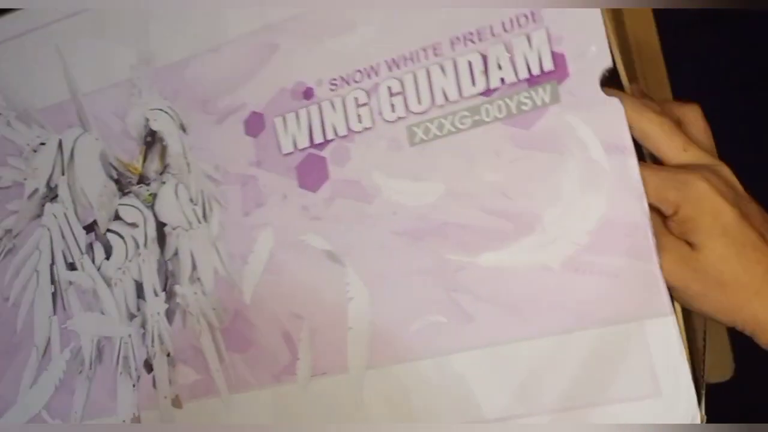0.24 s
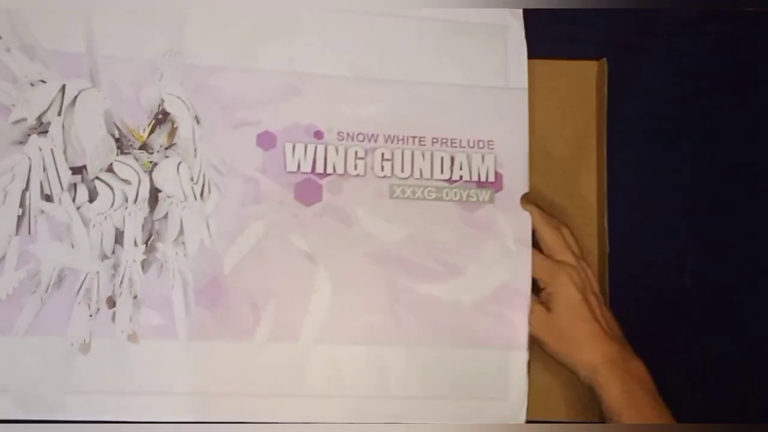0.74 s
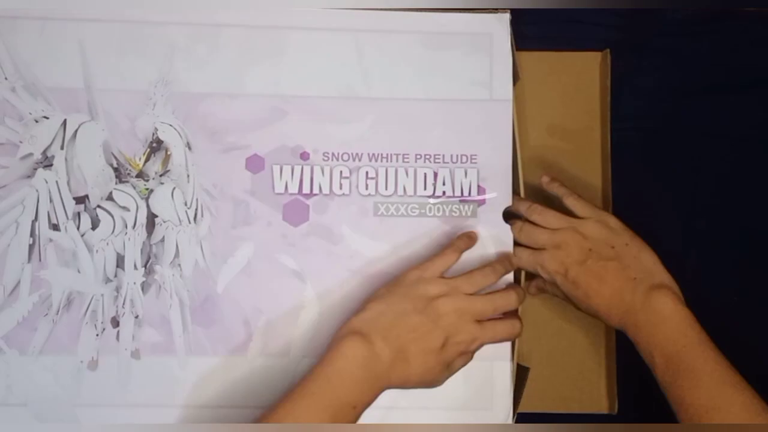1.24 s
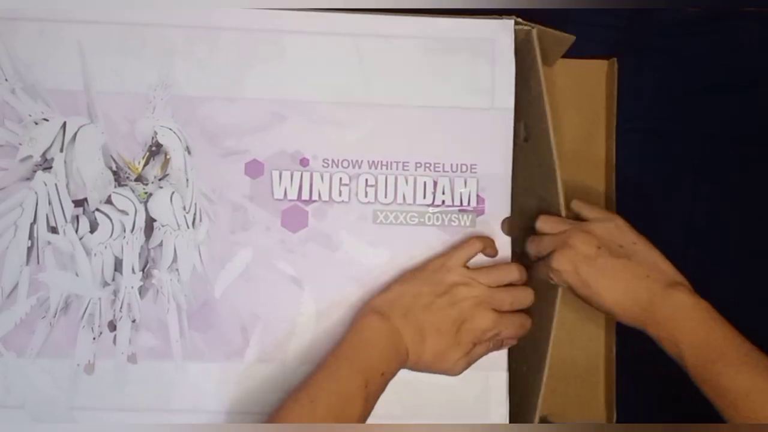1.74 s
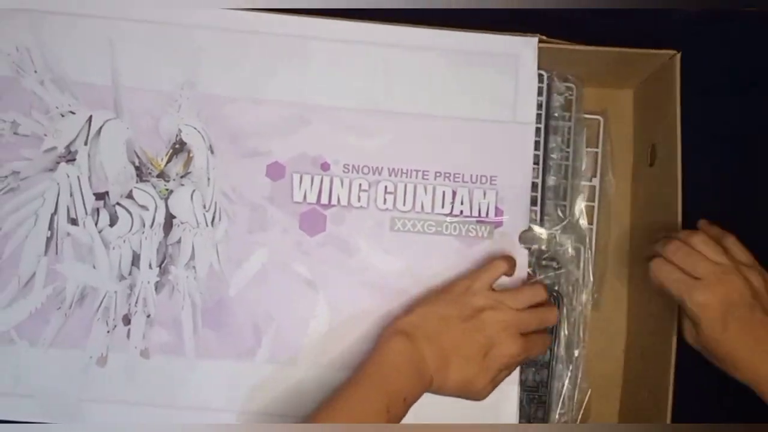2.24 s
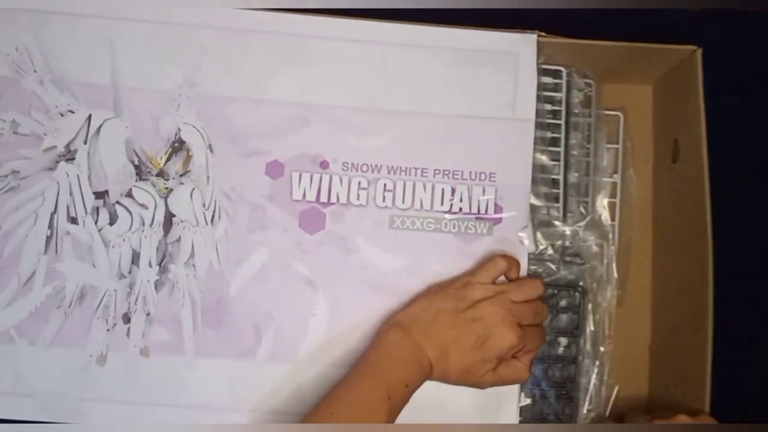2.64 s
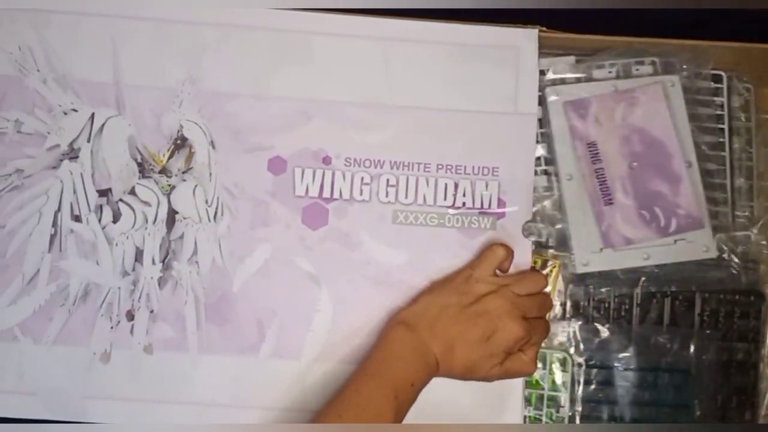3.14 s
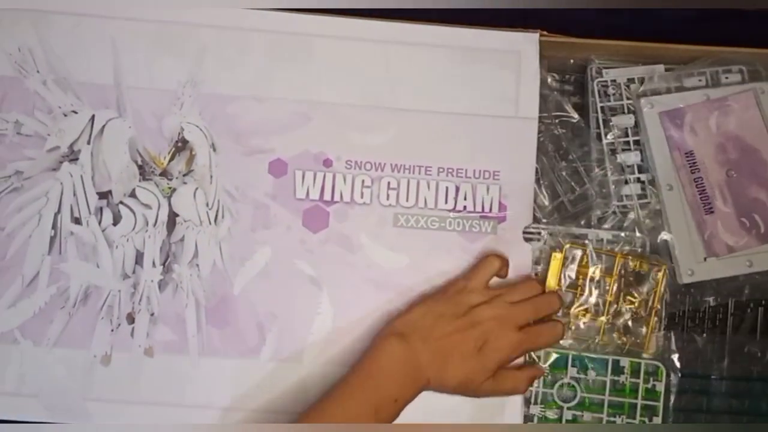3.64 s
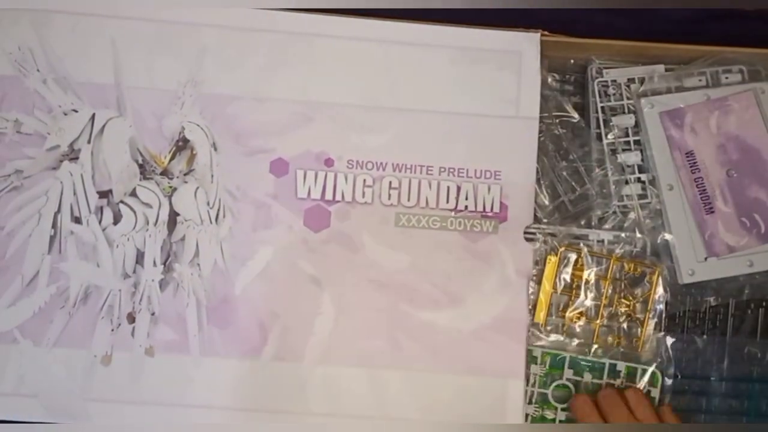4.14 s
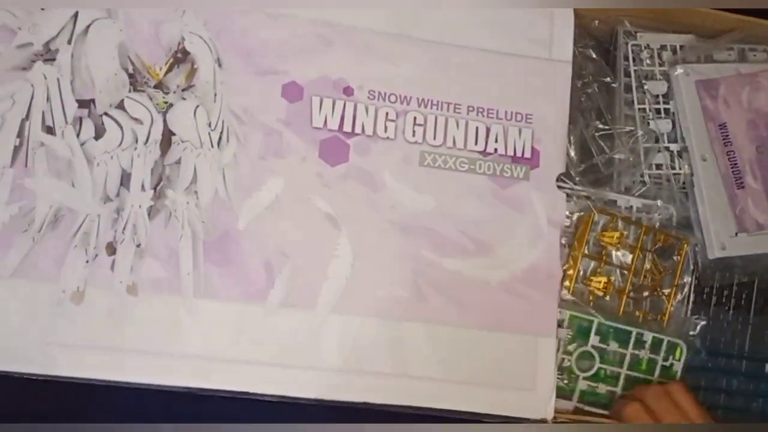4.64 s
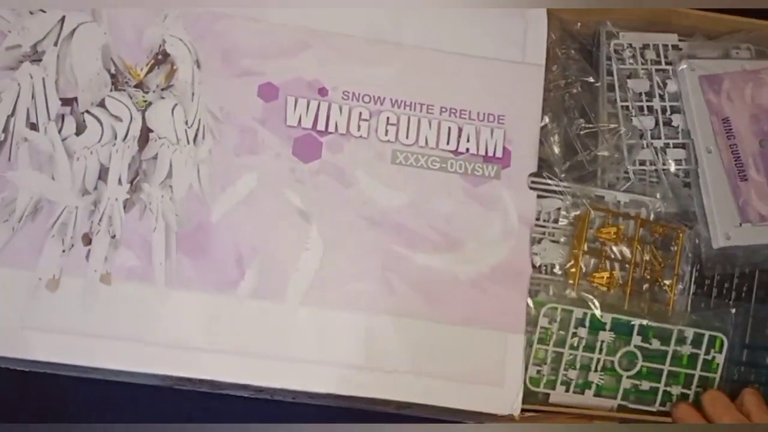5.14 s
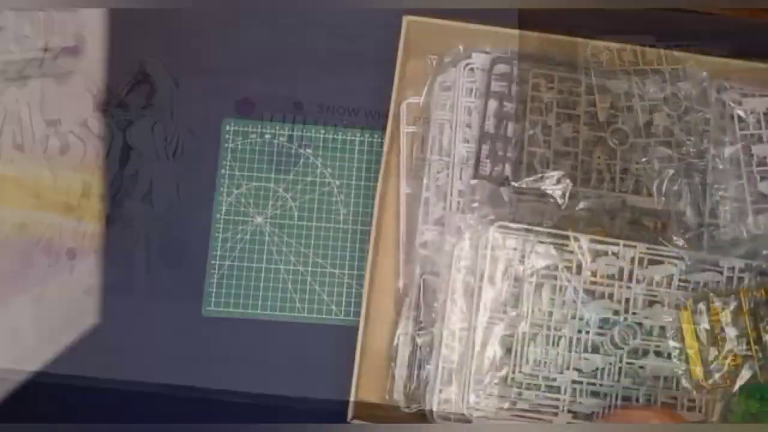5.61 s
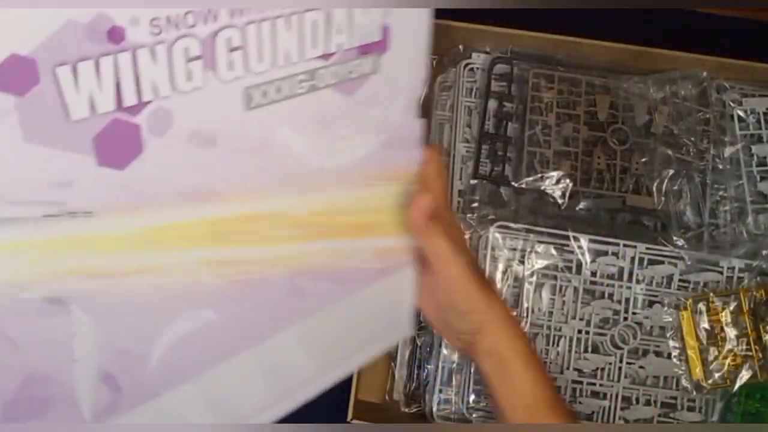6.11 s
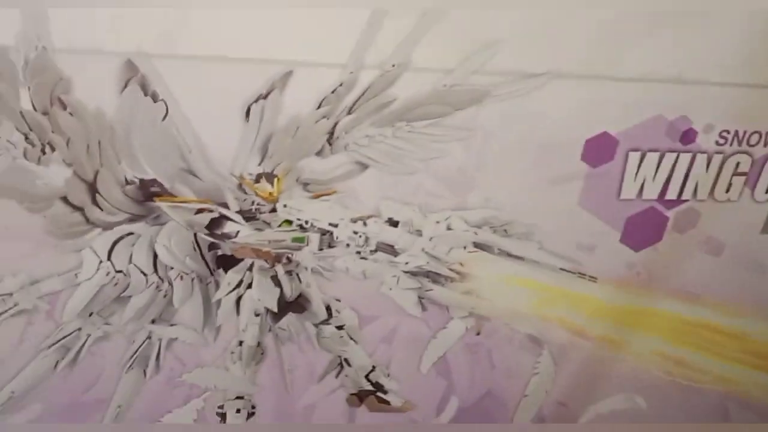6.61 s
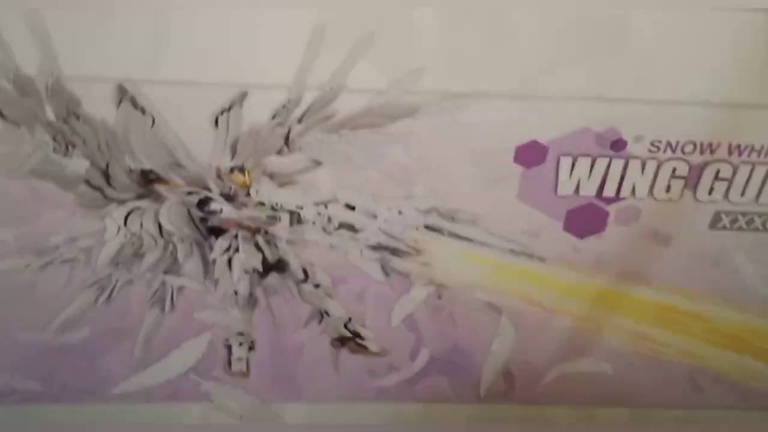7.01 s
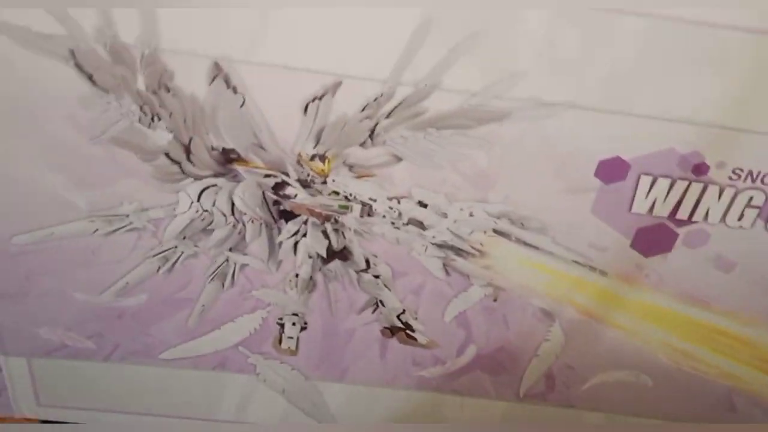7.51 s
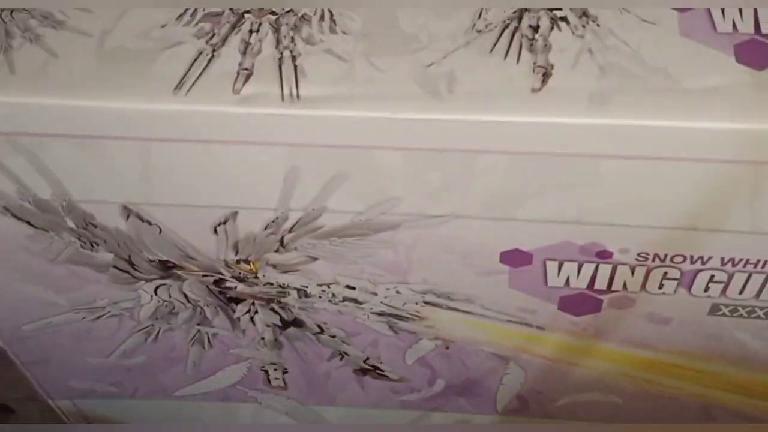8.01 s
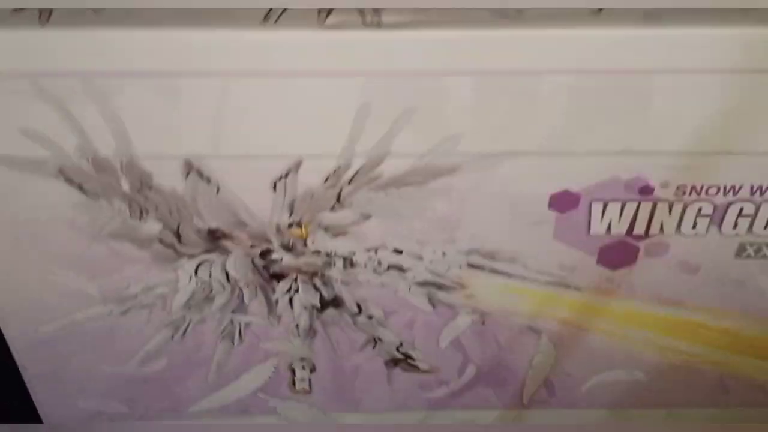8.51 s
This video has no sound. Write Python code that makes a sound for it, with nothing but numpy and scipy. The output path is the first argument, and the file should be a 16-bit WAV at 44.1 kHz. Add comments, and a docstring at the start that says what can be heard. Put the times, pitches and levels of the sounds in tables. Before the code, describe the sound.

A small dry room, close stereo microphone, faint wavering low hum sinking slightly in pauses. From 0 to 1.6 s hands brush printed cardboard in short hissy strokes, with dull light knocks, a few tiny snaps and a very faint squeak near 0.4. From 1.6 to 2.3 a tray scrapes out, raspy with a low board drone; small knocks around 2.3 to 2.4. A second, longer and steadier pull runs 2.6 to 3.55, then a hard, short bump at 3.7. From 4.0 to 4.9 plastic bags crinkle in short bursts with crisp snaps, strongest about 4.4 to 4.7. A near-quiet gap, then soft rubs and taps from 5.1. At 6.2 a loud knock and brush as the hollow lid is picked up; quick rubs and knocks continue, with a firm cluster at 7.7 to 7.9. Around 8.45 three rapid ringing catches judder, then a hollow thud and fading rubs until about 8.8.

```python
"""A large cardboard box is handled close to the microphone in a small room, over a faint, unsteady mains hum.
First hands brush the lid (rubbing noise) amid knocks, a faint squeak (dying tones) and snaps (noise clicks).
Then the tray scrapes out in two long pulls (rubbing noise again) and bumps free.
Next, bags of plastic parts crinkle: short rubs through film and board, with more snaps.
At the end the hollow lid is picked up, turned and knocked, its panels and air ring, and it judders briefly."""
import sys
import numpy as np
from scipy import signal
from scipy.fft import rfft, irfft, next_fast_len
from scipy.io import wavfile
from scipy.ndimage import uniform_filter1d, map_coordinates

SR = 44100
rng = np.random.default_rng(int(sys.argv[2]) if len(sys.argv) > 2 else 0)


def inscribe(sig):
    """Save sig as 16-bit PCM at rate SR to the path in sys.argv[1].

    A 1-D sig is mono; a 2-D sig holds one channel per row.
    Samples are clipped to [-1, 1] before scaling.
    """
    pcm = np.round(np.clip(np.atleast_2d(sig).T, -1, 1) * 32767)
    wavfile.write(sys.argv[1], SR, pcm.astype(np.int16))


N = 386316  # length in samples

# All levels in the tables are relative; the functions set the final loudness.
# quiet room air, spectrum: [pitch_hz, level_db (per Hz)]
AIR_SPECTRUM = [(25, -2.5), (75, 1), (120, 13), (190, -7), (400, -9.5), (700, -17), (2500, -17.5),
                (5000, -26), (8000, -24.5), (15500, -37)]
# hands brush the cardboard: [fastest_s, rise_s, fall_s, hiss_db, drone_db (against the hiss)]
HAND_STROKES = [(.028, 0.071, 0.049, -58, 3.5), (.12, 0.045, .075, -57, -4.5), (.2, 0.027, 0.047, -49, -4),
                (.285, 0.13, 0.075, -67, 9), (.535, .05, 0.054, -74.5, 10), (.655, .04, 0.11, -52.5, -14),
                (.777, 0.031, .045, -60, 8), (.885, .03, .04, -60, -15), (.945, 0.086, 0.087, -57.5, 0),
                (1.13, 0.066, 0.026, -64, -13), (1.335, 0.027, 0.062, -60, -2),
                (1.4, 0.036, 0.027, -68, -19), (1.49, 0.073, .04, -63.5, 2), (1.572, 0.033, 0.027, -58, -7),
                (2.435, 0.036, .035, -60, 8), (2.503, 0.046, 0.042, -59, -6), (2.54, 0.044, 0.027, -59, -3),
                (3.665, 0.04, 0.063, -57.5, -19.5), (3.71, 0.048, 0.022, -54, -5),
                (5.11, 0.055, .05, -70.5, -22), (5.168, 0.029, 0.052, -58.5, 2),
                (5.245, 0.074, 0.07, -59.5, -0.5), (5.312, 0.033, 0.036, -54.5, -22),
                (5.415, 0.072, 0.065, -57.5, 3), (5.498, 0.011, 0.026, -65.5, -20),
                (5.66, 0.061, 0.039, -63.5, 8.5), (5.79, 0.16, 0.032, -65, -14),
                (6.075, 0.0075, 0.075, -62, 4), (6.2, 0.043, 0.086, -45.5, 4.5),
                (6.34, .08, 0.086, -61, -2), (6.545, 0.042, .04, -57.5, -38),
                (6.61, 0.033, 0.047, -50.5, -2), (6.695, 0.11, 0.083, -61, 3.5),
                (6.82, 0.038, 0.041, -46.5, -2), (6.89, 0.033, 0.032, -62.5, -4),
                (6.975, .06, 0.18, -59.5, -58), (7.095, 0.047, 0.053, -49.5, 1.5),
                (7.165, 0.038, 0.037, -70, 12.5), (7.315, 0.079, 0.095, -63.5, -49),
                (7.503, 0.043, 0.023, -61, 1), (7.54, 0.042, 0.036, -71, 23), (7.625, 0.028, .04, -60, -15),
                (7.705, 0.042, 0.063, -51, 3), (7.795, .03, 0.037, -51, 1), (7.905, 0.084, 0.034, -59, 13),
                (7.985, 0.041, 0.038, -49, -4), (8.085, 0.048, 0.078, -58.5, -41),
                (8.128, 0.022, 0.036, -60, 1), (8.24, 0.13, 0.12, -62, -23.5),
                (8.325, 0.057, 0.045, -52, 1.5), (8.455, 0.045, 0.035, -51.5, 4),
                (8.535, 0.048, 0.058, -53.5, 3.5), (8.62, 0.093, 0.066, -55.5, -29),
                (8.73, 0.087, 0.088, -55, -6.5)]
# fingers on printed card, fine hiss: [pitch_hz, level_db (per Hz)]
SKIN_HISS_SPECTRUM = [(2500, -47.5), (4500, -17.5), (5500, -11.5), (6600, -5.5), (7800, 2), (9700, -6.5),
                      (12500, -5), (15500, -4)]
# hands pressing on card, coarse rasp: [pitch_hz, level_db (per Hz)]
BRUSH_SPECTRUM = [(300, -15), (700, -2.5), (1100, -0.5), (1800, 1.5), (3200, -0.5), (4400, -5),
                  (5400, -32.5), (8000, -44.5)]
# the lid droning under a rub: [pitch_hz, level_db (per Hz)]
LID_DRONE_SPECTRUM = [(30, -40), (130, -4), (210, -12.5), (330, -1.5), (480, 1), (720, -4), (1000, -7.5),
                      (1500, -24), (4000, -37.5)]
# jolts that ring the cardboard: knocks, one faint squeak at 0.438 s, and near the end (8.44 to 8.48 s)
# a stick-slip judder, quick catches about 20 ms apart that ring a panel:
# [start_s, level_db, panel_pitch_hz, decay_to_minus_60_db_s (set by the grip),
#  hollow_boom_db (against the jolt), scuff_db (against the jolt)]
PANEL_JOLTS = [(0.002, -42, 394, 0.076, -18, -25), (0.046, -47, 288, 0.11, -26, -18),
               (0.195, -40.5, 276, 0.18, -7, -20), (0.198, -46, 757, 0.084, -25, 1.5),
               (0.256, -42.5, 309, 0.045, -23, -10), (0.438, -58.5, 783, 0.082, -25, -26),
               (0.496, -50, 410, 0.036, -9, -2.5), (0.519, -48.5, 237, 0.063, -1, -8),
               (0.766, -36, 289, 0.075, 0, -9), (0.935, -46.5, 340, 0.1, -13, -12),
               (1, -37.5, 297, 0.036, -24, -19), (1.112, -48, 379, .05, -21, -14),
               (1.329, -49, 396, .07, -20, 0), (1.465, -46, 288, 0.05, -8, -14),
               (1.492, -50, 342, .06, -10, -10), (2.258, -46, 252, 0.076, -3, -22),
               (2.34, -46.5, 443, 0.073, -17, -6.5), (2.356, -36, 220, 0.092, -8, -8.5),
               (2.419, -38.5, 207, 0.053, -5, -13), (3.697, -22, 340, 0.031, -21.5, -16.5),
               (3.703, -31, 572, 0.039, -37, -24), (4.204, -36.5, 277, 0.036, -17, -14),
               (4.851, -49.5, 333, .04, -23, 7.5), (5.157, -53, 906, 0.089, -4, 6.5),
               (5.607, -42.5, 363, 0.062, 9.5, -1), (5.638, -35, 520, 0.04, -4, -9.5),
               (6.072, -50, 275, 0.058, -8, -22), (6.167, -33, 402, 0.24, -34, -11),
               (6.19, -23, 418, 0.088, -38, -20), (6.194, -32.5, 922, 0.1, -37, -27),
               (6.228, -28.5, 360, 0.076, -27, -18), (6.329, -40.5, 350, 0.077, -16, -6),
               (6.374, -27.5, 262, 0.023, -18, -12), (6.462, -42, 296, 0.032, -25, -16),
               (6.602, -42, 670, 0.15, -12, -9), (6.771, -36, 448, 0.04, -25, -27),
               (7.045, -39, 489, 0.15, -40, -10.5), (7.372, -40.5, 428, 0.072, -33, -25),
               (7.504, -37.5, 535, .05, -11, -16), (7.645, -37, 438, 0.047, -19, -7.5),
               (7.722, -32.5, 470, 0.034, -23, -14), (7.768, -21, 290, 0.024, -4.5, -16),
               (7.792, -32, 235, .07, 6.5, -8), (7.839, -23.5, 564, 0.017, -11, -16.5),
               (7.88, -25.5, 330, 0.071, -6, -10), (8.3, -40, 488, 0.08, -10.5, -6.5),
               (8.44, -20.5, 694, .074, -30, -16.5), (8.46, -23.5, 685, 0.1, -28, -10),
               (8.48, -26.5, 670, 0.043, -15, -16), (8.501, -28.5, 280, 0.054, 1.5, -6)]
# ways the cardboard panels ring: [pitch_hz, level_db, decay_to_minus_60_db_s (under a loose grip)]
PANEL_MODES = [(219, -15, 0.14), (294, -2.5, 0.31), (343, -19, 0.09), (411, -1.5, 0.11), (541, -5.5, 0.22),
               (641.7, 7.5, 0.096), (805, 4.5, 0.075), (947, 2.5, 0.079), (1130, -10.5, 0.1),
               (1250, -28.5, 0.042), (1690, -2.5, 0.067), (2060, 3, 0.099)]
# air inside the lid: [pitch_hz, level_db, decay_to_minus_60_db_s]
LID_AIR_MODES = [(117.2, 1, 0.14), (140.3, 6, 0.081)]
# scuff of crushed fibres: [pitch (multiple of the panel's), level_db (per Hz)]
SCUFF_SPECTRUM = [(.2, 0), (.7, -10.5), (1.3, 7), (2.5, -2.5), (5, -10), (12, -39), (30, -50.5)]
# sharp snaps of film and card edges: [start_s, level_db, left_minus_right_db]
EDGE_SNAPS = [(0.0318, -38, 0.0), (0.2967, -40, 7.5), (0.4968, -40, 10.0), (1.4501, -51, 1.5),
              (1.6427, -42, 0.5), (2.3371, -50, -0.5), (3.6596, -37, 2.0), (4.2497, -31, 1.0),
              (4.3789, -38, 1.0), (4.3954, -29, 1.5), (4.4308, -35, 2.0), (4.5281, -34, 3.0),
              (4.5521, -31, 3.5), (4.592, -41, 4.5), (4.6279, -31, -1.5), (4.6763, -26, 2.5),
              (4.9028, -34, 3.5), (5.2026, -43, 0.0), (5.3004, -40, 1.5), (6.0696, -46, 0.5),
              (6.6069, -35, -1.0)]
# snapping film: [pitch_hz, level_db (per Hz)]
FILM_SPECTRUM = [(400, -46), (1000, -23.5), (1800, -13.5), (2900, -10), (4200, 0.5), (5500, -14),
                 (6600, -4.5), (7800, 7.5), (9700, -2.5), (12500, -9), (15500, 3)]
# two pulls on the tray, each a list of points: [time_s, hiss_db, drone_db]
TRAY_PULLS = [
    [(1.62, -102, -88), (1.644, -54.5, -64), (1.782, -44.5, -49), (1.88, -52.5, -47), (2.152, -52, -53.5),
     (2.176, -60, -53), (2.244, -56, -72), (2.266, -69.5, -66), (2.31, -104, -80)],
    [(2.57, -72, -91), (2.6, -57.5, -55), (2.632, -50, -53), (3.066, -50, -43), (3.326, -50, -45),
     (3.524, -57, -53.5), (3.55, -69, -55), (3.576, -87, -74), (3.6, -74, -69)],
]
# fine friction hiss of tray and bags: [pitch_hz, level_db (per Hz)]
FRICTION_HISS_SPECTRUM = [(2500, -36), (4500, -12), (5500, -11), (6600, -4), (7800, 1.5), (9700, -6),
                          (12500, -7), (15500, -6)]
# coarse rasp of the sliding tray: [pitch_hz, level_db (per Hz)]
SCRAPE_SPECTRUM = [(300, -19.5), (700, 0.5), (1100, -3), (1700, -5), (2800, -2.5), (4300, -9),
                   (5400, -24.5), (8000, -33)]
# the tray's board droning under a rub: [pitch_hz, level_db (per Hz)]
TRAY_DRONE_SPECTRUM = [(30, -32), (120, -14), (220, -13.5), (295, 2), (410, -3), (560, -9), (950, -14),
                       (1600, -27), (4000, -42)]
# bags shift in the tray: [fastest_s, rise_s, fall_s, crinkle_db, drone_db (against the crinkle)]
BAG_SHIFTS = [(4.005, 0.028, .05, -52, -20), (4.06, 0.051, 0.055, -52, -23.5),
              (4.212, .055, .04, -46.5, -9), (4.265, 0.071, 0.14, -47, -14.5),
              (4.395, 0.027, 0.028, -49.5, -25), (4.465, 0.044, 0.052, -48.5, -20),
              (4.56, 0.033, 0.053, -53, -29.5), (4.65, .02, .04, -50, -41), (4.69, 0.033, 0.073, -47, -23),
              (4.74, 0.06, 0.079, -46.5, -12), (4.865, 0.02, 0.048, -49.5, -1)]
# coarse crinkle of the bags: [pitch_hz, level_db (per Hz)]
CRINKLE_SPECTRUM = [(500, -33), (1100, -10), (1800, 0), (2900, 5), (4200, 0), (5400, -15), (8000, -40)]
# small room: [pitch_hz, decay_to_minus_60_db_s]
ROOM_DECAY = [(150, 0.19), (600, 0.13), (3000, 0.23), (12000, 0.11)]
# how alike left and right are: [pitch_hz, likeness (1 = same, 0 = unrelated)]
LIKENESS = [(130, 0.96), (290, 0.96), (640, 0.49), (1400, 0.093), (3000, 0)]
# the two microphone ports: [pitch_hz, left_minus_right_db]
PORT_BALANCE = [(200, -0.5), (700, -1), (2500, 0.5), (8500, 0.3), (11000, 0), (15000, 7.5)]

BAND_LIMIT_HZ = 15900
STROKE_DROP_DB, STROKE_ROUNDNESS = 17, 1.644  # fall over a stroke's rise or fall time; 2 = bell-shaped
SNAP_TRIM_DB = -5
LIGHT_JOLT_DB = -39  # the jolt level to which the contact time refers
CONTACT_CYCLES, HARDNESS_SHORTENS = 1.06, 0.27  # cycles of the panel; dB shorter per dB harder
LOOSE_GRIP_DECAY_S = 0.08  # a firmer grip damps the other panels too


def amp(db):
    """Turn decibels into a gain."""
    return 10 ** (np.asarray(db) / 20)


def unit(x):
    """Scale x to an average strength (rms) of 1."""
    return x / np.sqrt(np.mean(x ** 2) + 1e-20)


def along(points, hz):
    """Read (pitch_hz, value) points at any pitch, on a log axis."""
    pitch, value = np.transpose(points)
    return np.interp(np.log(hz + 1), np.log(pitch + 1), value)


def wobble(rate):
    """A smooth random curve with `rate` random points a second."""
    points = rng.standard_normal(int(N * rate / SR) + 4)
    return map_coordinates(points, [np.arange(N) * rate / SR])


def fade(t, t60):
    """Die away smoothly, by 60 dB in t60 seconds."""
    return np.exp(-np.log(1000) * t / t60)


def filtered(x, response):
    """Change the strength of each pitch in x by a response curve."""
    size = x.shape[-1]
    padded = next_fast_len(size + 8192)
    hz = np.fft.rfftfreq(padded, 1 / SR)
    return irfft(rfft(x, padded) * response(hz), padded)[..., :size]


def add(track, s, sound):
    """Mix a sound into the track at time s."""
    part = track[..., max(round(s * SR), 0):][..., :sound.shape[-1]]
    part += sound[..., :part.shape[-1]]


def stereo_angle(hz):
    """Half the angle between left and right: small where they are alike, larger where they differ."""
    return np.arccos(np.clip(along(LIKENESS, hz), -1, 1)) / 2


def spread(pair, spectrum):
    """Colour two unrelated signals into stereo: bass alike, treble apart, middle at rms 1."""
    def middle_and_side(hz):
        angle = stereo_angle(hz)
        return amp(along(spectrum, hz)) * [np.cos(angle), np.sin(angle)]

    mid, side = filtered(pair, middle_and_side)
    return np.array([mid + side, mid - side]) / np.std(mid)


def background():
    """Mains hum, slightly unsteady in phase and level, in quiet room air made of coloured noise."""
    t = np.arange(N) / SR
    hum = np.sqrt(2) * np.sin(2 * np.pi * 119.8 * t + 0.34 * wobble(12))
    hum_gain = amp(-68 + 1.2 * wobble(13))
    air = amp(-70) * spread(rng.standard_normal((2, N)), AIR_SPECTRUM)
    return hum_gain * hum + air


def strokes(rows):
    """Hiss and drone gains: each movement speeds up and slows down in the same rounded shape."""
    t, hiss, drone = np.arange(N) / SR, 0, 0
    for s, rise, fall, hiss_db, drone_db in rows:
        away = np.minimum(np.abs(t - s) / np.where(t < s, rise, fall), 10)
        power = amp(hiss_db - STROKE_DROP_DB * away ** STROKE_ROUNDNESS) ** 2
        hiss = hiss + power
        drone = drone + power * amp(drone_db) ** 2
    return np.sqrt(hiss), np.sqrt(drone)


def slips(rate, scatter_db, smooth):
    """Tiny catches of random size, each a brief burst, over the smooth hiss of countless finer ones."""
    happens = rng.random(N) < rate / SR  # rate: catches a second
    sizes = happens * amp(scatter_db * np.minimum(rng.standard_normal(N), 2.5))
    burst_s = 0.0007
    power = signal.lfilter([1], [1, -np.exp(-1 / (burst_s * SR))], sizes ** 2)
    return np.sqrt(power / power.mean() + smooth ** 2) * rng.standard_normal((2, N))


def shifting(pair, depth_db, width_hz):
    """The contact point wanders over the sheet, so narrow resonances come and go."""
    z = signal.stft(pair, nperseg=1024)[2]
    pitches, frames = z.shape[1:]
    # a smooth random landscape over pitch and time
    field = rng.standard_normal((int(SR / 2 / width_hz) + 4, frames // 4 + 4))
    pitch_steps = np.linspace(0, SR / 2, pitches) / width_hz
    time_steps = np.arange(frames) / 4
    grid = np.meshgrid(pitch_steps, time_steps, indexing="ij")
    gain = amp(depth_db * np.tanh(map_coordinates(field, grid)))
    return signal.istft(z * gain, nperseg=1024)[1][:, :N]


def rub(motion, hiss, rasp, drone, rate, scatter_db, smooth, judder_db, ring_db, hiss_db, rasp_db, drone_db):
    """Surfaces catch and slip: a light touch only hisses, pressure adds a rasp and makes the board drone."""
    hiss_gain, drone_gain = motion
    coupling = 0.33  # how far the rasp follows pressure rather than speed
    rasp_gain = hiss_gain ** (1 - coupling) * drone_gain ** coupling
    catches = slips(rate, scatter_db, smooth)
    fine = spread(shifting(catches, ring_db / 2, width_hz=260), hiss)
    coarse = spread(shifting(catches, ring_db, width_hz=178.4), rasp)
    board = spread(shifting(slips(250, 1.5, 1.2), ring_db, width_hz=118.7), drone)
    mix = amp(hiss_db) * hiss_gain * fine
    mix = mix + amp(rasp_db) * rasp_gain * coarse
    mix = mix + amp(drone_db) * drone_gain * board
    judder = unit(amp(judder_db * wobble(110)))
    return judder * mix


def brushing_hands():
    """Skin catches and slips on the printed card, and the hollow lid drones under the pressure."""
    return rub(strokes(HAND_STROKES), SKIN_HISS_SPECTRUM, BRUSH_SPECTRUM, LID_DRONE_SPECTRUM,
               rate=1500, scatter_db=5.5, smooth=3.1, judder_db=2.0, ring_db=10,
               hiss_db=2, rasp_db=-1, drone_db=0.5)


def ring(t, hz, t60):
    """One dying tone; the higher it is, the more its phase can differ between the two ports."""
    apart = stereo_angle(hz) * rng.uniform(-1.8, 1)
    tone = np.sin(2 * np.pi * hz * t + apart * np.array([[1], [-1]]))
    return fade(t, t60) * tone / np.cos(apart)


def other_panels(t, hz, t60):
    """The jolt also rings the other panels, up to about the main panel's own pitch range."""
    others = 0
    for pitch, level, life in PANEL_MODES:
        softness = 1 / np.sqrt(1 + (pitch / (1.12 * hz)) ** 4)  # soft contact leaves high tones still
        strength = amp(level + rng.normal(0, 3.2)) * rng.choice([-1, 1])
        detune = 1 + 0.015 * rng.standard_normal()  # the grip shifts each tone
        life = life * np.sqrt(t60 / LOOSE_GRIP_DECAY_S)
        others = others + strength * softness * ring(t, pitch * detune, life)
    return others


def ringing_panels():
    """Each knock, squeak or judder catch rings a panel, the others and the lid's air, and scuffs fibres."""
    out, t = np.zeros((2, N)), np.arange(SR // 3) / SR
    for s, db, hz, t60, boom_db, scuff_db in PANEL_JOLTS:
        rise = CONTACT_CYCLES / hz * amp(-HARDNESS_SHORTENS * (db - LIGHT_JOLT_DB))
        swell = 1 - np.exp(-(t / rise) ** 2)
        panel = 0.77 * ring(t, hz, t60) / np.max(swell * fade(t, t60))
        others = amp(-16.0) * other_panels(t, hz, t60)
        # crushed fibres add a scuff, brighter on a stiffer panel
        scuff_points = [(multiple * hz, level) for multiple, level in SCUFF_SPECTRUM]
        scuff = spread(rng.standard_normal((2, len(t))), scuff_points) * fade(t, 0.087)
        boom = sum(amp(level) * ring(t, pitch, life) for pitch, level, life in LID_AIR_MODES)
        boom = boom * (1 - np.exp(-t / 0.0076))  # the air builds up gradually
        jolt = swell * (panel + others + amp(scuff_db) * scuff)
        add(out, s, amp(db) * (jolt + amp(boom_db) * boom))
    return out


def snaps():
    """A crease flips over: a click of a few milliseconds and a short shiver of the sheet."""
    out, t = np.zeros((2, N)), np.arange(SR // 8) / SR
    shape = fade(t, 0.014) + amp(-16) * fade(t, 0.07)  # click + shiver
    for s, db, pan_db in EDGE_SNAPS:
        click = spread(rng.standard_normal((2, len(t))), FILM_SPECTRUM) * shape
        balance = amp(np.array([[pan_db], [-pan_db]]) / 2)
        add(out, s, amp(db + SNAP_TRIM_DB) * click * balance)
    return out


def room(x):
    """The small room answers with a short diffuse tail: noise that fades at its own pace at each pitch."""
    hz, t, z = signal.stft(rng.standard_normal((2, SR // 3)), SR, nperseg=256)
    tail = signal.istft(z * fade(t, along(ROOM_DECAY, hz)[:, None]), SR, nperseg=256)[1]
    tail = tail / np.linalg.norm(tail[0])
    tail = np.pad(tail, ((0, 0), (SR // 200, 0)))  # starts 5 ms late
    return signal.fftconvolve(x, tail, axes=1)[:, :N]


def gains(rows):
    """One gain per sample for each dB column, silent outside the rows."""
    s, *columns = np.transpose(rows)
    t = np.arange(N) / SR
    return [amp(np.interp(t, s, db, left=-np.inf, right=-np.inf)) for db in columns]


def sliding_tray():
    """Cardboard fibres catch and slip as the tray is pulled out, and its board drones."""
    pulls = np.sum([gains(pull) for pull in TRAY_PULLS], axis=0)
    return rub(pulls, FRICTION_HISS_SPECTRUM, SCRAPE_SPECTRUM, TRAY_DRONE_SPECTRUM,
               rate=1400, scatter_db=4.5, smooth=1.25, judder_db=0.63, ring_db=3.0,
               hiss_db=1.5, rasp_db=2.0, drone_db=-1.26)


def crinkling_bags():
    """Fewer, more distinct catches in the creases of the bags, and the tray drones beneath them."""
    return rub(strokes(BAG_SHIFTS), FRICTION_HISS_SPECTRUM, CRINKLE_SPECTRUM, TRAY_DRONE_SPECTRUM,
               rate=600, scatter_db=5, smooth=0.9, judder_db=0.9, ring_db=10.5,
               hiss_db=2, rasp_db=-1.5, drone_db=0.5)


def scene():
    """Hum, rubbing, crinkling, ringing panels and snaps; the room answers the last two."""
    short_sounds = ringing_panels() + snaps()
    rubbing = brushing_hands() + sliding_tray() + crinkling_bags()
    return background() + rubbing + short_sounds + amp(-16.5) * room(short_sounds)


def expander(x, threshold_db, depth_db):
    """Noise suppression: the gain sinks when little sounds above the hum."""
    heard = filtered(x.mean(0), lambda hz: hz > 200)
    power = np.abs(uniform_filter1d(heard ** 2, SR // 25))  # averaged over 40 ms
    return x * amp(-depth_db / (1 + power / amp(threshold_db) ** 2))


def record(dry):
    """Cut deep bass, balance the ports by pitch, turn pauses down and stop what is above the band limit."""
    def microphone(hz):
        bass_cut = (1j * hz / (1j * hz + 45)) ** 2
        left_minus_right_db = along(PORT_BALANCE, hz)
        return bass_cut * amp(np.array([left_minus_right_db, -left_minus_right_db]) / 2)

    quieted = expander(filtered(dry, microphone), threshold_db=-63.0, depth_db=8.0)
    return filtered(quieted, lambda hz: 1 / np.sqrt(1 + (hz / BAND_LIMIT_HZ) ** 300))


dry = scene()
out = record(dry)
inscribe(out)
```